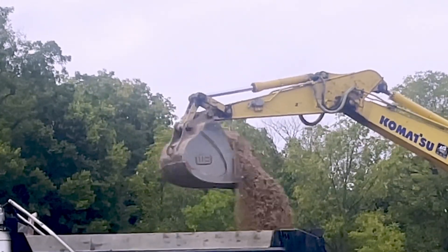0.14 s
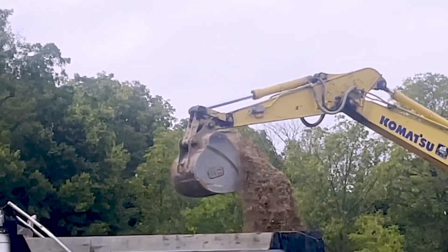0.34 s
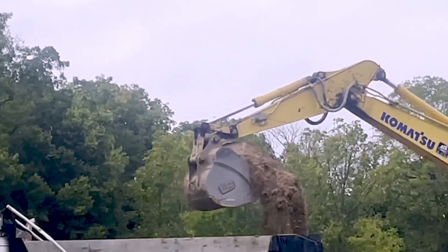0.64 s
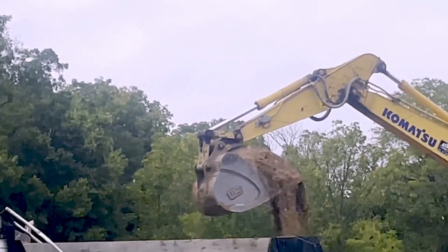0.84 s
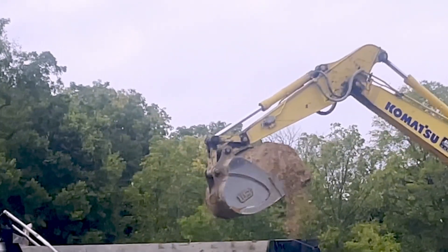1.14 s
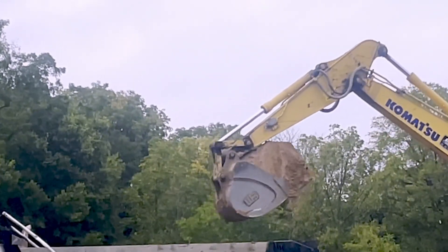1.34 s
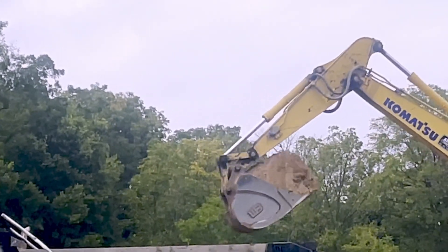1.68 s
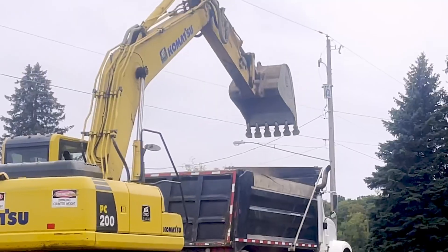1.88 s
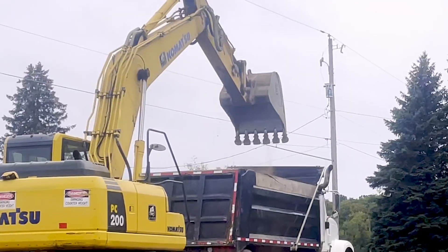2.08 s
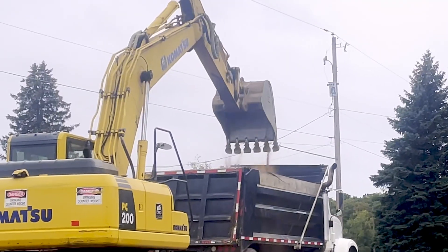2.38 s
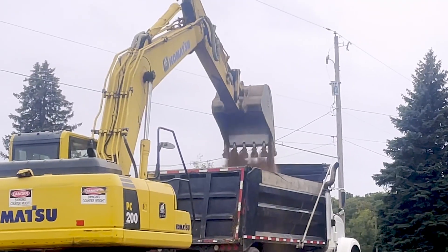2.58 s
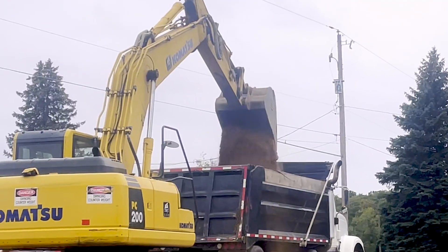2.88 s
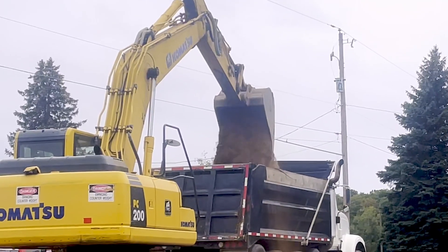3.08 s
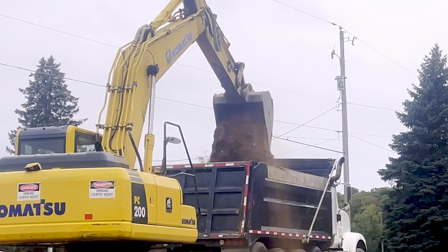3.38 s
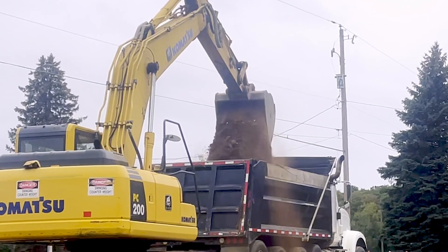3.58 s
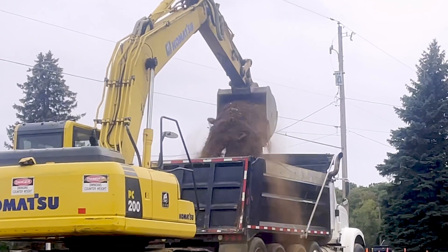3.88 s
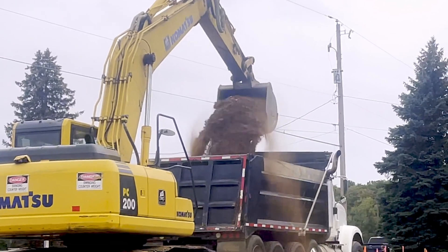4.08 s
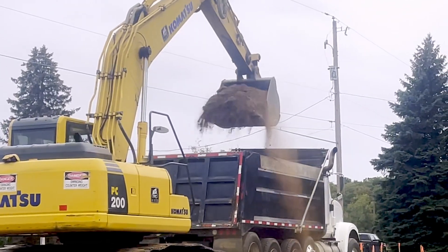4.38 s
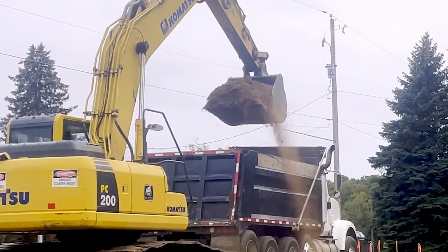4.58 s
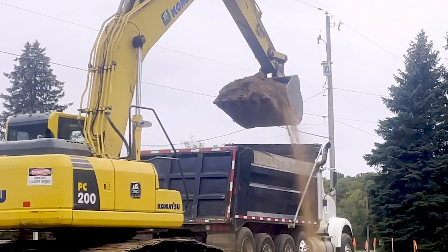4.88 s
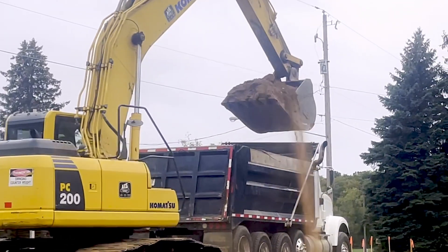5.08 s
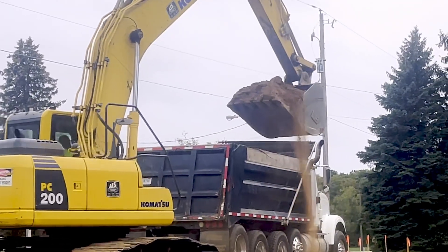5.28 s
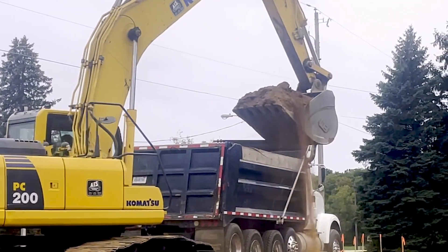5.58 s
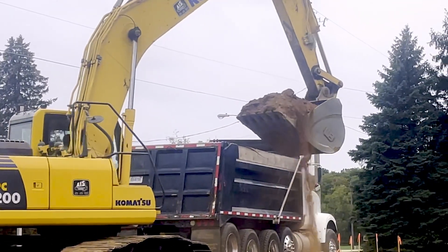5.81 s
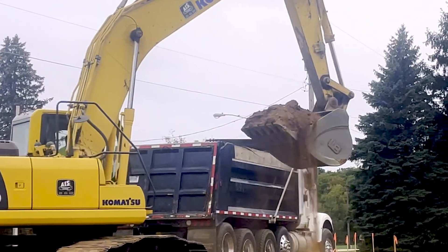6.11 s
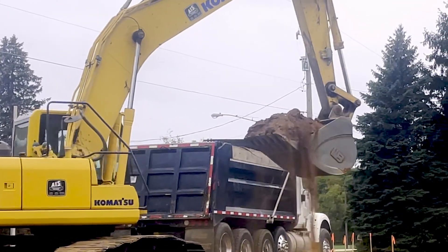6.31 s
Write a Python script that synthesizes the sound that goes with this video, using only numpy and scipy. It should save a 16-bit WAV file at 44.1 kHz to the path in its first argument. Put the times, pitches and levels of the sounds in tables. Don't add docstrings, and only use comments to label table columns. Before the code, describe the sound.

Outdoors, played backwards: two heavy clods boom on a steel truck bed at once, with a burst of dirt rattle, knocks and dusty hiss, each impact swelling and cutting off. The load thins within a second, leaving a distant diesel drone. Then an abrupt change brings the excavator close and louder, with hydraulic whine, thin turbo whistle, oil hiss and a few faint reversed knocks and pings. Stereo, dull top.

```python
import sys
import numpy as np
from scipy import signal
from scipy.fft import rfft, irfft, next_fast_len
from scipy.io import wavfile
from scipy.ndimage import uniform_filter1d, map_coordinates

SR = 44100
rng = np.random.default_rng(int(sys.argv[2]) if len(sys.argv) > 2 else 0)


def waveform_to_disk(signal):
    frames = np.transpose(np.atleast_2d(signal))
    scaled = np.clip(frames, -1, 1) * 32767
    samples = np.round(scaled).astype(np.int16)
    wavfile.write(sys.argv[1], SR, samples)


def convert_level_to_amplitude(level_db):
    exponent = np.asarray(level_db, float) / 20
    return 10 ** exponent


N = 284445
T = np.arange(N) / SR
CUT_S = 1.7495
NEAR = T > CUT_S
FAR = ~NEAR

# stop_s, peak_db
BOOMS = [
    (0.0172, -5.5),
    (0.0357, -6),
]
# pitch_hz, level_db, t60_s (time to fall 60 dB)
FLOOR_PLATE = [(228, -13, 0.48), (303, -5, 0.09), (374, -30, 0.046), (595, -6.5, 0.045)]
# time_s, level_db
DIRT_FLOW = [(0.0, -29), (0.02, -18.5), (0.35, -38), (0.742, -41.5), (0.9, -39)]
# pitch_hz, level_db per Hz
DIRT_COLOUR = [(180, -30), (300, -27), (415, -10.5), (1240, -2), (1710, -5.5), (2800, 3.5), (6040, -0.5),
               (7730, 0), (10400, -51), (11900, -25), (15500, -62), (22000, -120)]
# pitch_hz, width_hz, level_db
STEEL_BED = [(222, 81, 18), (610, 27, 10.5), (897, 120, 1.5), (1297, 150, 0.5), (2002, 82, -3),
             (2390, 26, -7), (2780, 310, -9), (3160, 33, -5), (4500, 58, -21), (5100, 69, -42),
             (6320, 31, -39), (7020, 21, -7), (8690, 470, -9), (7840, 200, -6)]
# stop_s, level_db, steady_s, centre_hz, spread_octaves
THUDS = [(.037, -20.5, 0.017, 342, 0.13), (.037, -16.5, 0.013, 950, 0.56), (.187, -21, 0.092, 3260, 1.28),
         (.345, -31.5, .034, 866, 0.37), (.801, -42.5, .091, 1770, 0.12), (.875, -29, .057, 395, 0.7),
         (0.86, -42, 0.19, 465, 0.084), (.879, -23.5, 0.044, 1810, 0.78), (.87, -36.5, 0.089, 343, 0.036),
         (1.708, -31, .03, 269, 0.13), (4.78, -36, 0.053, 330, 0.27)]
# stop_s, level_db, steady_s
STONES = [
    (.1, -19.5, 0.0073),
    (.165, -19.5, 0.0067),
    (.735, -38, 0.0099),
    (1.27, -39, 0.0055),
    (1.304, -36.5, 0.0059),
    (2.355, -40, 0.0036),
    (4.11, -41, .015),
]
# stop_s, level_db, steady_s
CLUMPS = [
    (.29, -27, .027),
    (.35, -27, 0.021),
    (0.391, -38, 0.06),
    (2.829, -37, 0.059),
]
# stop_s, level_db, steady_s
GRIT = [
    (.135, -22, 0.023),
    (.242, -28.5, 0.027),
    (0.41, -33, 0.0098),
    (.559, -42, 0.037),
    (0.671, -37, 0.027),
    (.874, -42, 0.011),
    (2.774, -38.5, 0.0073),
    (4.07, -50.5, 0.015),
    (4.129, -35, 0.016),
    (4.248, -38, 0.053),
]
# stop_s, level_db, steady_s
PINGS = [
    (2.653, -36.5, 0.018),
    (3.455, -33, 0.0068),
    (3.803, -33, .006),
]
# centre_hz, spread_octaves
KIND_COLOURS = [(2650, 0.51), (2500, 1.24), (6300, 1), (8240, 0.22)]
# time_s, firing_hz, level_db
ENGINE = [(0, 93.5, -32), (.22, 95.9, -30.5), (.5, 93.6, -32), (1, 97.3, -26.5), (1.749, 97.6, -31),
          (1.75, 94.5, -20.5), (2.1, 94.2, -21.5), (2.3, 96, -20.5), (2.44, 91, -21), (2.66, 99.6, -21),
          (3.24, 100, -22.5), (3.4, 98.8, -22.5), (4.35, 96, -22.5), (4.78, 97.4, -24), (4.86, 96.4, -20),
          (5.25, 94.6, -19.5), (5.8, 94.4, -22.5), (6.45, 95, -23)]
# multiple of the firing pitch, level_db against the firing tone
EXHAUST_ORDERS = [(1 / 3, -29), (4 / 3, -31), (5 / 3, -29), (7 / 3, -36), (3, -39.5)]
# start_s, end_s, level_db
FAN_SPELLS = [
    (0, .03, -20),
    (.1, .9, -36),
    (1.36, 1.72, -33),
    (2.16, 2.56, -37),
    (3.6, 3.84, -35.5),
    (4.05, 4.38, -38.5),
    (5.3, 6, -37.5),
]
# start_s, end_s, level_db
PUMP_SPELLS = [(0, .03, -41), (.52, .74, -44), (.78, .94, -39), (1.02, 1.16, -46), (1.4, 1.6, -44),
               (1.75, 1.79, -34), (1.86, 2.15, -35.5), (2.26, 2.34, -40.5), (2.52, 2.68, -36.5),
               (2.72, 3.28, -32), (3.54, 3.62, -36), (3.92, 4.24, -41), (4.4, 4.6, -37.5), (4.72, 5.1, -37),
               (5.24, 5.29, -31), (5.29, 5.4, -33), (5.4, 6.3, -27.5), (6.3, 6.4, -32)]
# pitch_hz, level_db per Hz
GROWL_FAR = [(20, -16), (32, -6), (60, 0), (140, 5), (270, 5), (340, -2), (450, -35)]
GROWL_NEAR = [(20, -4), (32, -3), (65, 4.5), (140, 2.5), (220, 0), (300, -4.5), (450, -33.5)]
# pitch_hz, level_db per Hz
ROAR_FAR = [(250, -41), (350, 4), (430, 5.5), (600, 6.5), (1000, 2), (1300, 4), (1700, -12), (2200, -6.5),
            (3100, -5), (4200, -45)]
ROAR_NEAR = [(250, -14), (350, -2), (420, -2.5), (750, 3), (1020, -7), (1260, -1), (1500, -9),
             (1750, -17.5), (2900, -21.5), (4000, -29)]
# pitch_hz, level_db per Hz
HISS_FAR = [(2500, -19), (3600, -6.5), (5000, -6.5), (7000, -9), (8300, -3), (9000, 3.5), (9600, -3),
            (10000, -44)]
HISS_NEAR = [(2500, -30.5), (3600, -8.5), (4600, -6), (5600, -3.5), (6700, -9), (7700, 1.5), (9000, 3),
             (9700, -5.5), (10000, -39)]
# start_s, end_s, extra_db
AIR_SURGES = [
    (2.3, 2.6, 1),
    (3.9, 4.6, 4),
    (5.4, 6, 0.5),
]
# time_s, whistle_hz
TURBO = [(1.8, 11720), (2.3, 11450), (2.55, 11080), (3.1, 11080), (3.4, 11300), (4, 11400), (4.55, 11630),
         (4.85, 11980), (6.45, 12090)]
# time_s, centre_hz, level_db
VALVE_OIL = [(1.75, 4900, -54.5), (2.7, 4900, -59.5), (3.7, 5050, -63), (4.1, 4910, -59), (4.55, 4840, -47),
             (4.72, 4960, -49.5), (4.95, 4952, -57.5), (5.3, 4190, -51.5), (6.45, 4150, -55)]
# pitch_hz, level_db
SIDE_FAR = [(60, -27), (130, -13.5), (270, -15.5), (570, -11), (1210, -11.5), (2550, -24.5), (5400, -26),
            (11400, -9.5)]
SIDE_NEAR = [(60, -59), (97, -31.5), (160, -20.5), (250, -31.5), (400, -14), (650, -18), (1050, -18.5),
             (1700, -6.5), (2730, 6), (4400, -8.5), (7100, -13.5), (11400, -17)]
# pitch_hz, level_db per Hz
LOOSE_AIR = [(8700, -70), (9050, 1.5), (10300, 2.5), (11000, -6.5), (11500, -59)]
# pitch_hz, level_db
FAINTEST_MID = [(1500, -90), (1900, -74.5), (3400, -74), (4000, -81), (5800, -77), (6600, -74.5),
                (7500, -84), (9600, -80), (9900, -72), (12000, -72)]
FAINTEST_SIDE = [(100, -65.5), (1200, -68.5), (1800, -97), (3600, -99), (4200, -80), (6300, -78),
                 (7300, -78.5), (8500, -73.5), (9200, -70.5), (11000, -69.5)]


def unit(x):
    return x / np.sqrt(np.mean(x ** 2) + 1e-20)


def along(points, hz):
    f, v = np.transpose(points)
    return np.interp(np.log(hz + 1), np.log(f + 1), v)


def curves(rows):
    s, *cols = np.transpose(rows)
    return [np.interp(T, s, c) for c in cols]


def wobble(rate):
    coarse = T[::16]
    knots = rng.standard_normal(int(N * 60 / SR))
    return np.interp(T, coarse, map_coordinates(knots, [coarse * min(rate, 55)]))


def filtered(x, response):
    m = next_fast_len(len(x) + 8192)
    return irfft(rfft(x, m) * response(np.fft.rfftfreq(m, 1 / SR)), m)[:len(x)]


def coloured_noise(response):
    return unit(filtered(rng.standard_normal(N), response))


def stand(far, near):
    return np.where(NEAR, near, far)


def summed(*levels_db):
    return 10 * np.log10(sum(convert_level_to_amplitude(2 * db) for db in levels_db))


def spells(rows, idle_db, fade_s):
    levels = []
    for start, end, db in rows:
        away = np.clip(np.maximum(start - T, T - end) / fade_s, 0, 1)
        levels.append(db + (idle_db - db) * away)
    return np.max(levels, axis=0)


def rush(far, near, patchy_db):
    z = signal.stft(rng.standard_normal(N), nperseg=512)[2]
    patches = uniform_filter1d(rng.standard_normal(z.shape), size=6, axis=0)
    patches = uniform_filter1d(patches, size=10, axis=1)
    x = signal.istft(z * convert_level_to_amplitude(patchy_db * unit(patches)), nperseg=512)[1][:N]
    far_sound = unit(filtered(x, lambda hz: convert_level_to_amplitude(along(far, hz))))
    near_sound = unit(filtered(x, lambda hz: convert_level_to_amplitude(along(near, hz))))
    return stand(far_sound, near_sound)


def bed(hz):
    return 0.3 + sum(convert_level_to_amplitude(db) / (1 + (2 * (hz - c) / w) ** 2) for c, w, db in STEEL_BED)


def gravel(count, spiky_db):
    grains = np.repeat(rng.standard_normal(count // 64 + 1), 64)[:count]
    return unit(rng.standard_normal(count) * convert_level_to_amplitude(spiky_db * grains))


def booms():
    x = np.zeros(N)
    for s, peak_db in BOOMS:
        before = np.clip(s - T, 0, 1)
        for hz, mode_db, t60 in FLOOR_PLATE:
            x = x + convert_level_to_amplitude(peak_db + mode_db - 60 * before / t60) * np.sin(2 * np.pi * hz * before)
    return x


def dirt_stream():
    grit = gravel(count=N, spiky_db=2.0)
    stream = unit(filtered(grit, lambda hz: convert_level_to_amplitude(along(DIRT_COLOUR, hz)) * bed(hz) ** 1.18))
    level_db = curves(DIRT_FLOW)[0] - 0.9 + 0.93 * wobble(41.1)
    return stream * convert_level_to_amplitude(level_db) * (T < .88)


def clods():
    swell_s, swell_per_steady = 0.034, 3.6
    fine_dust_db = -5
    blows = list(THUDS)
    for rows, kind in zip([STONES, CLUMPS, GRIT, PINGS], KIND_COLOURS):
        blows += [row + kind for row in rows]
    before = np.arange(SR // 2)[::-1] / SR
    pad = np.zeros(N + SR)
    for s, db, steady, centre_hz, spread in blows:
        dust = convert_level_to_amplitude(fine_dust_db) * (s > CUT_S)

        def colour(hz):
            octaves = abs(np.log2(hz / centre_hz + 1e-9))
            return bed(hz) * np.exp(-.5 * (octaves / spread) ** 3) * np.where(hz < 9900, 1, dust)

        rattle = unit(filtered(gravel(count=len(before), spiky_db=2.0), colour))
        t60 = swell_s + swell_per_steady * steady
        swell = convert_level_to_amplitude(db - 60 * np.clip(before - steady, 0, 1) / t60)
        swell = swell * (1 - np.exp(-before / 0.0033))
        pad[round((s + .002) * SR):][:len(before)] += rattle * swell
    return pad[SR // 2:][:N]


def exhaust(phase, firing_db):
    x = np.sin(phase) * convert_level_to_amplitude(1.1 * wobble(21.25))
    for k, db in EXHAUST_ORDERS:
        x = x + convert_level_to_amplitude(db + 2.9 * wobble(9)) * np.sin(k * phase + 0.28 * wobble(5.4))
    second_db = stand(far=-37, near=-35) - 1.1 * np.clip(wobble(13) ** 2, 0, 5)
    second = convert_level_to_amplitude(second_db + 1.5 * wobble(14)) * np.sin(2 * phase + 0.35 * wobble(12))
    return x * convert_level_to_amplitude(firing_db) + second


def fan(phase):
    db = spells(FAN_SPELLS, idle_db=-46, fade_s=0.029)
    return convert_level_to_amplitude(db + 2.2 * wobble(15)) * np.sin(2.835 * phase + .7 * wobble(14))


def pump(rate):
    db = spells(PUMP_SPELLS, idle_db=-55, fade_s=0.064)
    return convert_level_to_amplitude(db + 1.4 * wobble(24)) * np.sin(12 * np.pi * np.cumsum(rate) / SR + .2 * wobble(25))


def growl():
    shake_db = -23.5 - 60 * T / 2.2
    db = summed(stand(far=-32.5, near=-31), shake_db)
    return convert_level_to_amplitude(db + 0.27 * wobble(9)) * rush(GROWL_FAR, GROWL_NEAR, patchy_db=1.2)


def roar():
    rumble_db = -22.5 - 60 * T / 0.81
    db = summed(stand(far=-42.5, near=-36.5), rumble_db)
    return convert_level_to_amplitude(db + 2.0 + 0.57 * wobble(7)) * rush(ROAR_FAR, ROAR_NEAR, patchy_db=1.17)


def spray_and_air(spray_db=-26.5, peak_s=0.14, rise_db_s=33, t60=1.46):
    change_db = np.where(T < peak_s, rise_db_s * (peak_s - T), 60 * (T - peak_s) / t60)
    settle_db = FAR * 9.5 * np.clip(T - 1.28, 0, 1)
    surge_db = spells(AIR_SURGES, idle_db=0, fade_s=0.27)
    return summed(spray_db - change_db, stand(far=-41.5, near=-41.5) - settle_db + surge_db)


def hiss():
    db = spray_and_air()
    x = convert_level_to_amplitude(db - 2.12 + 0.58 * wobble(18)) * rush(HISS_FAR, HISS_NEAR, patchy_db=1.67)
    air = coloured_noise(lambda hz: (hz > 9700) * (hz < 12000) * (1 + .35 * (hz < 10300)))
    turbo_khz = (curves(TURBO)[0] - 11900) / 1000
    x = x + convert_level_to_amplitude(db + stand(far=-27, near=-22.6 + 2 * turbo_khz)) * air
    fines = coloured_noise(lambda hz: (hz > 11000) * (hz < 11850))
    return x + FAR * convert_level_to_amplitude(-44 + 1.5 * (db + 26.5)) * fines


def engine():
    rate, firing_db = curves(ENGINE)
    phase = 2 * np.pi * np.cumsum(rate + 0.36 * wobble(20)) / SR
    tones = exhaust(phase, firing_db) + fan(phase) + pump(rate)
    pulse = np.sin(phase)
    return np.sqrt(2) * tones + growl() + roar() * (1 + 0.12 * pulse) + hiss() * (1 + 0.04 * pulse)


def truck():
    beat = np.sin(2 * np.pi * np.cumsum(68.5 + 6 * wobble(16)) / SR)
    return convert_level_to_amplitude(stand(far=-34.5, near=-32) + 1.8 * wobble(14)) * beat


def turbo():
    hz = curves(TURBO)[0]
    db = -58.5 - 4 * np.clip((11300 - hz) / 220, 0, 1)
    whistle = np.sin(2 * np.pi * np.cumsum(hz + 25 * wobble(58)) / SR)
    return NEAR * convert_level_to_amplitude(db + 3.7 * wobble(25)) * whistle


def valve_oil():
    centre_hz, db = curves(VALVE_OIL)
    narrow = coloured_noise(lambda hz: 1 / (1 + (hz / 180) ** 4))
    wide = coloured_noise(lambda hz: 1 / (1 + (hz / 450) ** 4))
    weak, opened = (-51 - db) / 14, (4750 - centre_hz) / 500
    share = np.clip(np.maximum(weak, opened), 0, 1)
    flow = narrow * np.sqrt(1 - share) + wide * np.sqrt(share)
    turn = 2 * np.pi * np.cumsum(centre_hz) / SR
    ports = np.sin(turn) + 0.61 * np.sin(1.16 * turn)
    return NEAR * np.sqrt(2) * convert_level_to_amplitude(db) * flow * ports


def far_side(hz):
    return convert_level_to_amplitude(along(SIDE_FAR, hz)) * np.exp(-1j * np.clip(hz / 1200, 0, np.pi / 2))


def near_side(hz):
    lag = np.clip(hz / 300, 0, np.pi / 2) * np.sign(3100 - hz)
    return convert_level_to_amplitude(along(SIDE_NEAR, hz)) * np.exp(-1j * lag)


def scene():
    load = booms() + dirt_stream() + clods()
    machine = engine() + truck() + turbo() + valve_oil()
    z = signal.stft(machine + 0.67 * load, nperseg=1024)[2]
    echoes = z * np.exp(2j * np.pi * rng.random(z.shape))
    both = signal.istft(z + .5 * echoes, nperseg=1024)[1][:N]
    side = stand(filtered(both, far_side), filtered(both, near_side))
    loose = coloured_noise(lambda hz: convert_level_to_amplitude(along(LOOSE_AIR, hz)))
    side = side + loose * convert_level_to_amplitude(spray_and_air() - 7.5 + 0.22 * wobble(8))
    return np.array([machine + load + side, machine + load - side])


def drop_faint(x, faintest, loud_db, fickle_db):
    hz, t, z = signal.stft(x, SR, "cosine", nperseg=2048)
    bands = z[:1024].reshape(256, 4, -1)
    centre = hz[2:1024:4, None]
    level_db = 20 * np.log10(abs(bands).max(axis=1) + 1e-10)
    level_db = uniform_filter1d(level_db, size=2, axis=1)
    local = unit(uniform_filter1d(rng.standard_normal(level_db.shape), size=4, axis=1))
    waver = centre / 10000 * rng.standard_normal(len(t)) + 0.4 * local
    limit_db = along(faintest, centre) + np.interp(t, T, loud_db) + fickle_db * waver
    bands = bands * (level_db > limit_db)[:, None]
    z = np.vstack([bands.reshape(1024, -1), z[1024:]])
    return signal.istft(z, SR, "cosine", nperseg=2048)[1][:N]


def top_cut(x):
    return signal.sosfilt(signal.butter(12, 12040, fs=SR, output="sos"), x)


def record(dry):
    dry = dry / (1 + abs(dry / .9) ** 4) ** (1 / 4)
    mid, side = (dry[0] + dry[1]) / 2, (dry[0] - dry[1]) / 2
    treble = filtered(mid, lambda hz: (hz > 3500) * (hz < 9500))
    loud_db = 10 * np.log10(abs(uniform_filter1d(treble ** 2, size=4096)) + 1e-12)
    loud_db = .85 * (loud_db - np.median(loud_db))
    mid = drop_faint(mid, FAINTEST_MID, loud_db, fickle_db=1.9)
    side = drop_faint(side, FAINTEST_SIDE, loud_db, fickle_db=4.5)
    return top_cut(np.array([mid + side, mid - side]))


dry = scene()
out = record(dry)
waveform_to_disk(out)
```